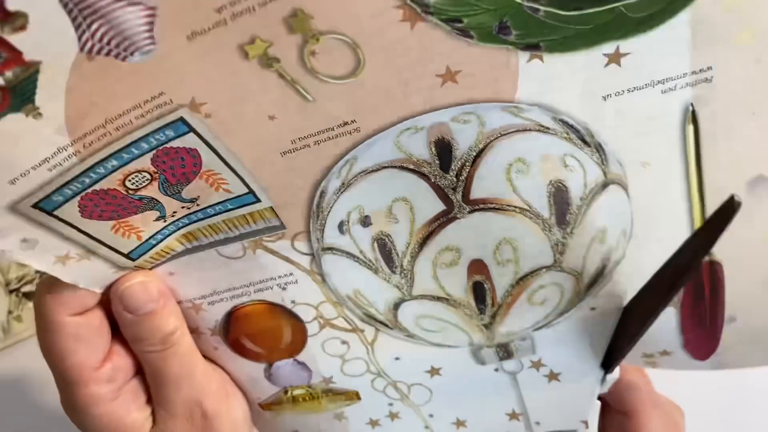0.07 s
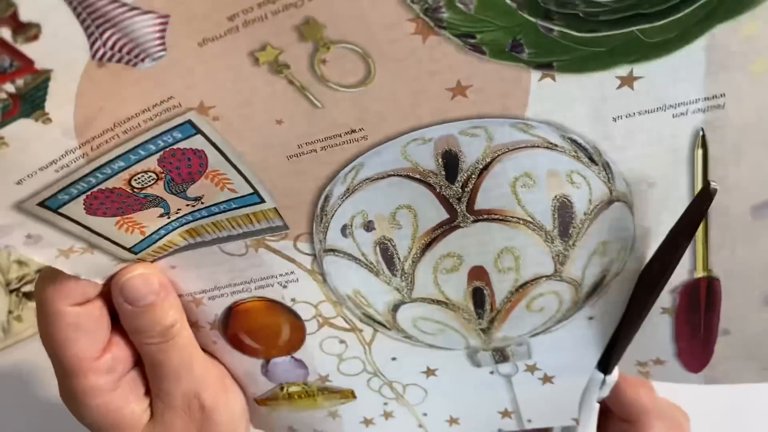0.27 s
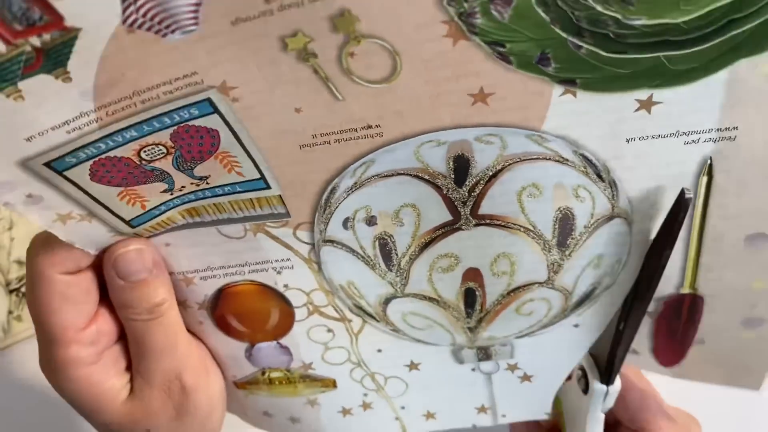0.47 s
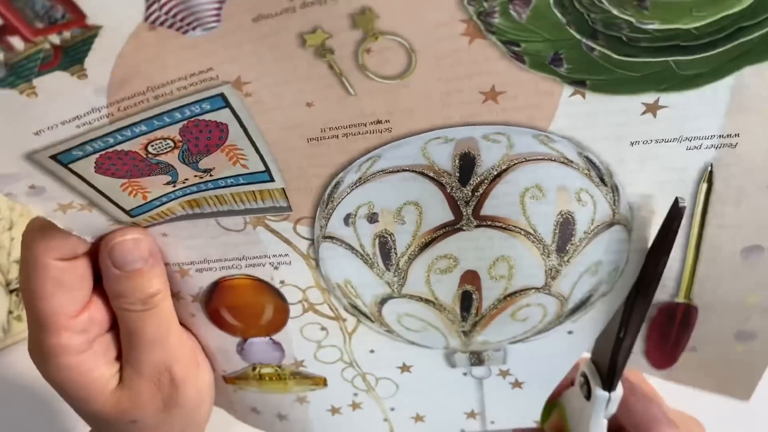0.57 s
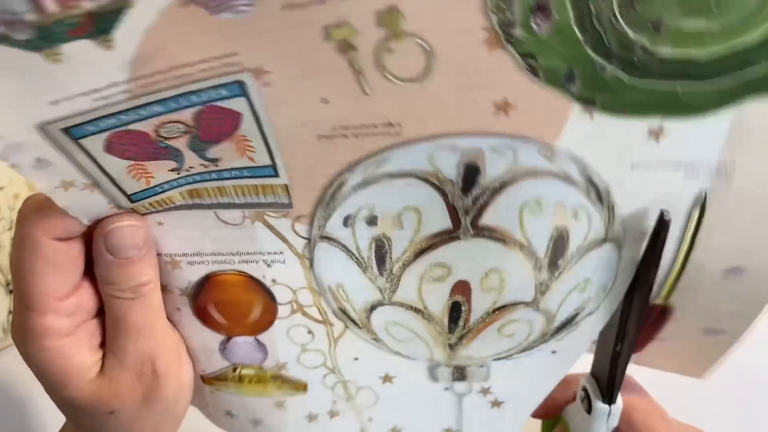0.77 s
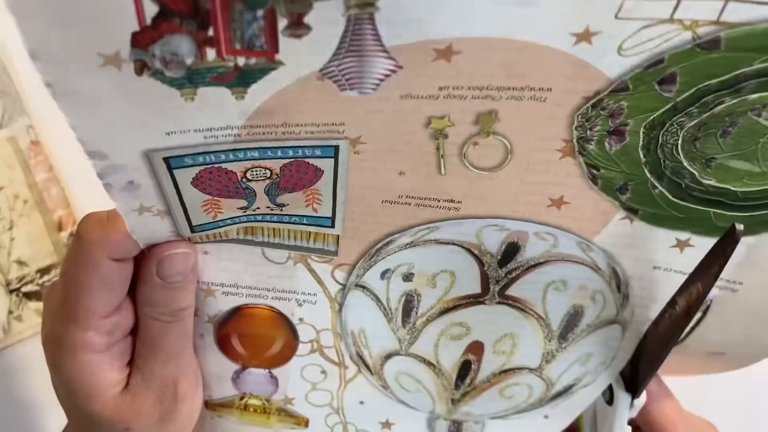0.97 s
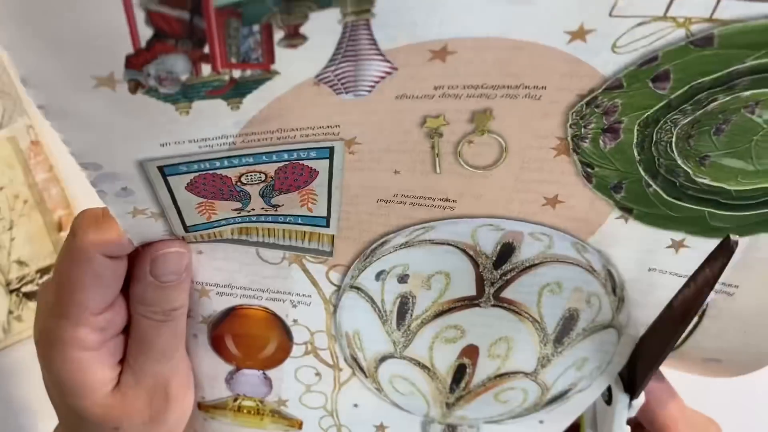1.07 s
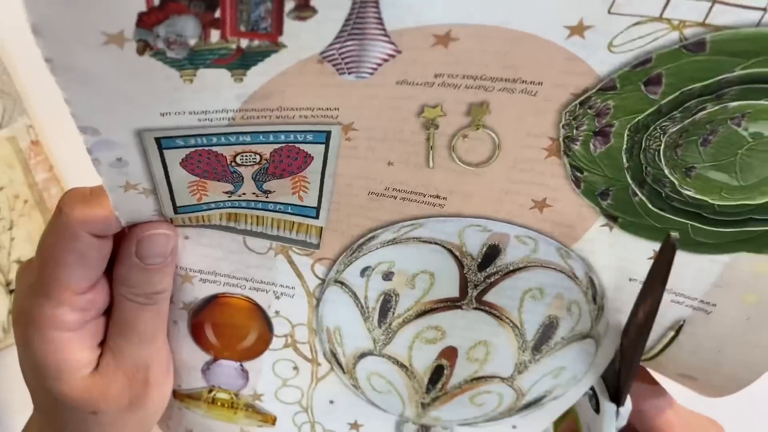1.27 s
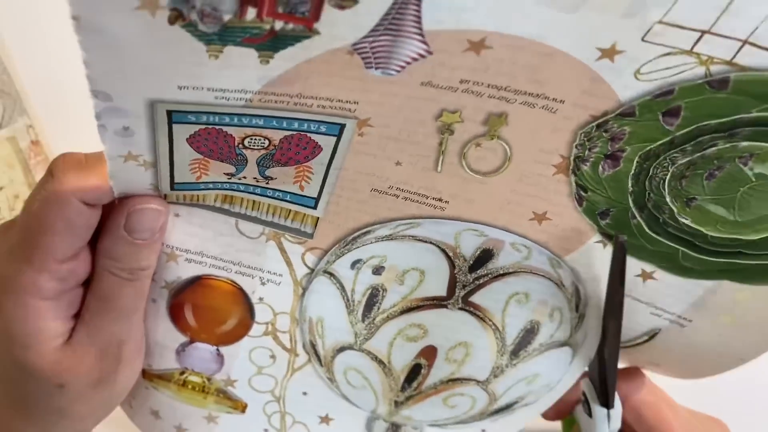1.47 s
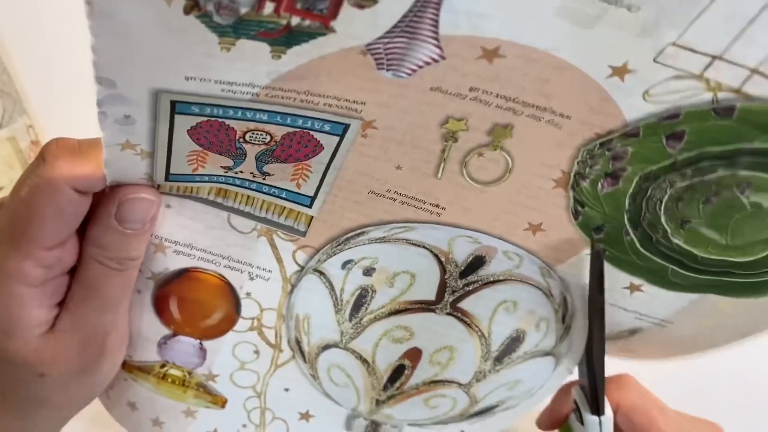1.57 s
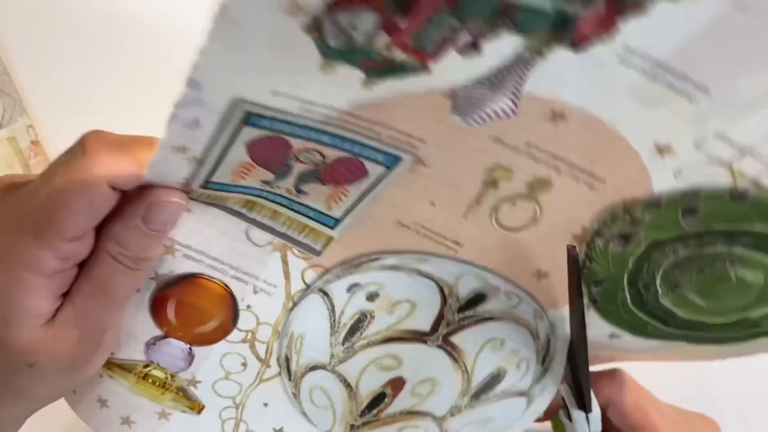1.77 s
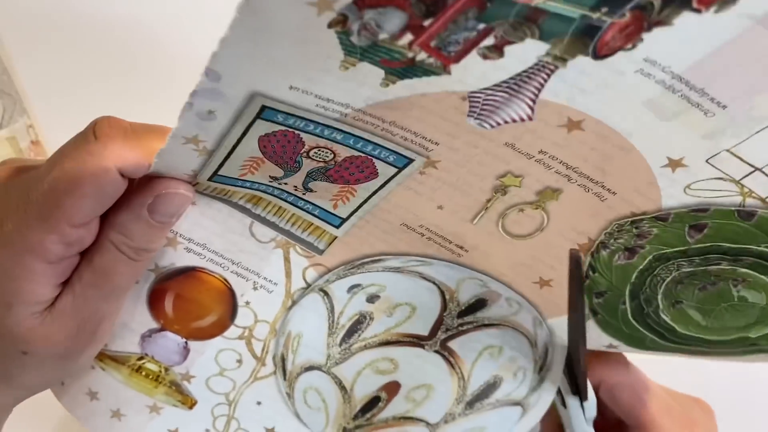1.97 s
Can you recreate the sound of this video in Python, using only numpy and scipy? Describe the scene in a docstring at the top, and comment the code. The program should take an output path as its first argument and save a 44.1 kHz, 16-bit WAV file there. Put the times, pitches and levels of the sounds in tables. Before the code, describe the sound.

Scissors cut through a thin paper page in a row of quick, crisp strokes, close to the microphone at an indoor desk. Between the snips the held sheet rustles, crackles and buckles with soft pops.

```python
"""Close to a phone's two microphone ports, scissors cut a thin page in a row of quick strokes.
The handled page rumbles, its creases crackle, and it buckles with pops that fall in pitch.
Fibres part in dense tiny clicks that ring the sheet and hiss along the blades.
Each port also hears the far parts of the sheet differently, which widens the sound."""
import sys
import numpy as np
from scipy import signal
from scipy.fft import rfft, irfft
from scipy.io import wavfile
from scipy.ndimage import uniform_filter1d

SR = 44100
rng = np.random.default_rng(int(sys.argv[2]) if len(sys.argv) > 2 else 0)


def output_pcm(signal):
    """Save a mono or channel-first signal as 16-bit PCM at the path in sys.argv[1].

    Samples are clipped to [-1, 1] before scaling.
    """
    pcm = np.clip(np.atleast_2d(signal).T, -1, 1) * 32767
    wavfile.write(sys.argv[1], SR, np.round(pcm).astype(np.int16))


N = 88244
T = np.arange(N) / SR
HZ = np.maximum(np.arange(N // 2 + 1) * SR / N, 1)


def undb(db):
    """Decibels to gain."""
    return 10 ** (np.asarray(db) / 20)


def over_hz(table):
    """A (freq_hz, value) curve read at every frequency, on a log axis."""
    freq_hz, values = np.array(table, float).T
    return np.interp(np.log(HZ), np.log(np.maximum(freq_hz, 1)), values)


def colour(x, eq):
    """EQ by a (freq_hz, gain_db) curve, rolling off beyond its ends; unit rms."""
    rolloff = np.minimum(HZ / eq[0][0], 1) ** 4 * np.minimum(eq[-1][0] / HZ, 1) ** 4
    shaped = irfft(rfft(x) * undb(over_hz(eq)) * rolloff, N)
    return shaped / shaped.std()


def waver(rate_hz):
    """Smoothed random steps with the slow drift taken out; unit spread."""
    hold = int(SR / rate_hz)
    steps = np.repeat(rng.standard_normal(N // 50), hold)[:N]
    wobble = uniform_filter1d(steps, hold // 2)
    wobble -= uniform_filter1d(wobble, 4 * hold)
    return wobble / wobble.std()


def envelope(age_s, rise_s, t60_ms):
    """Quick attack, then an exponential decay that takes at least 10 ms to fall 60 dB."""
    attack = 1 - np.exp(-age_s / rise_s)
    return attack * np.exp(-np.log(1000) * 1000 * age_s / np.maximum(t60_ms, 10))


def page_rumble():
    """The held page flexes: low noise with a wavering level."""
    # swell of the rumble: time_s, level_db
    swell = [(0, -55), (0.053, -24.5), (.09, -42), (.55, -45.5), (.69, -38.5), (.74, -40), (.765, -35.5),
             (.83, -30), (.92, -32), (1.09, -51.5), (1.15, -42.5), (1.32, -51), (1.37, -40.5),
             (1.55, -38.5), (1.66, -43.5), (1.77, -40), (1.9, -49), (2.0, -55.5)]
    # tone of the flexing page: freq_hz, gain_db
    rumble_eq = [(35, -15.5), (60, -0.5), (170, -1.5), (350, -8.5)]
    time_s, level_db = np.array(swell).T
    waver_db = 2.18 * waver(rate_hz=22)
    return undb(np.interp(T, time_s, level_db) + waver_db) * colour(rng.standard_normal(N), rumble_eq)


def crease_crackles(clicks):
    """Creases crackle: bursts of clicks in a broad resonance; longer scrapes swell more slowly."""
    # one burst per crease: start_s, relative_level_db, centre_hz, decay_ms
    creases = [(.0052, -7, 1510, 5.5), (0.0246, -12.5, 1730, 0.5), (0.3144, -15.5, 1945, 39.5),
               (0.343, -17.5, 2040, 120.5), (0.551, -28, 1810, 58.5), (0.609, -25, 2000, 141.5),
               (0.685, -19.5, 845, 109.5), (0.8, -14.5, 1460, 3.5), (0.8131, -16, 1560, 44.5),
               (0.817, -28.5, 3430, 298.5), (1.046, -29, 2470, 7), (1.292, -31, 2980, 16),
               (1.354, -25.5, 3430, 96.5), (1.239, -29.5, 775, 139.5), (1.299, -28, 870, 97),
               (1.327, -33, 1110, 53.5), (1.535, -15, 2516, 54.5), (1.7188, -11, 2483, 48.5),
               (1.954, -41, 3450, 28.5), (1.978, -21.5, 1530, 200)]
    rise_share, relative_width = 0.0156, 0.794
    out, spectrum = np.zeros(N), rfft(clicks)
    for start_s, level_db, centre_hz, decay_ms in creases:
        detune = (HZ / centre_hz - centre_hz / HZ) / relative_width
        band = irfft(spectrum / (1 + detune ** 2), N)
        burst = envelope(np.maximum(T - start_s, 0), rise_share * decay_ms / 1000, decay_ms)
        out += undb(level_db) / 2 * burst * band / band.std()
    return out


def buckle_pops():
    """Each buckle is a bending wave: high pitch first, falling fast to a short, lower ring."""
    # buckles of the sheet: start_s, level_db, start_pitch_hz, end_pitch_hz, ring_ms
    buckles = [(0.0462, -11.5, 770, 511, 12.5), (0.0534, -17.5, 483, 126.6, 40), (0.419, -8, 890, 728, 8),
               (.685, -20.5, 887, 382, 73.5), (0.7976, -10.5, 1086, 404, 21.5),
               (0.8139, -6, 1214, 145.8, 73.5), (0.8983, -6, 438, 313, 26),
               (0.885, -16.5, 90, 74.76, 202.5), (0.928, -16.5, 299, 170.8, 56), (1.3604, -9, 957, 331, 19),
               (1.538, -11.5, 900, 692.3, 27), (1.778, -18, 934, 148.2, 70.5)]
    fall_s, rise_cycles = 0.001754, 0.64
    out = np.zeros(N)
    for start_s, level_db, start_hz, end_hz, ring_ms in buckles:
        age_s = np.maximum(T - start_s, 0)
        cycles = end_hz * age_s + (start_hz - end_hz) * fall_s * (1 - np.exp(-age_s / fall_s))
        pop = envelope(age_s, rise_cycles / start_hz, ring_ms) * np.sin(2 * np.pi * cycles)
        out += undb(level_db) * pop
    return out


def fibre_clicks():
    """Paper fibres part in dense clicks of very uneven size, over a soft bed of noise."""
    clicks_per_s, spread_db = 3000, 4.0
    snaps = rng.random(N) < clicks_per_s / SR
    accent_db = spread_db * np.minimum(rng.exponential(size=N), 1.7)
    sizes = undb(accent_db) * rng.standard_normal(N)
    return snaps * sizes + .3 * rng.standard_normal(N)


def scissor_cut(clicks):
    """The clicks ring the curved sheet, with one hollow resonance, and hiss along the blades."""
    # level curves of the strokes: time_s, sheet_level_db, blade_level_db
    strokes = [ (0, -67.5, -40), (0.036, -33, -73.5), (0.049, -21.5, -49), (0.087, -31, -49.5),
               (.22, -30.5, -42), (0.26, -32.5, -43), (.272, -51, -58.5), (.288, -51.5, -61),
               (0.295, -35.5, -46.5), (0.337, -39, -58), (0.345, -32.5, -34.5), (0.391, -35.5, -48),
               (0.416, -30, -38), (0.465, -32.5, -43), (.5, -40.5, -55), (.575, -46.5, -61.5),
               (0.616, -31.5, -39), (0.649, -32.5, -43.5), (0.675, -45, -48), (0.689, -37, -57.5),
               (.72, -55, -62.5), (0.749, -48.5, -82.5), (0.756, -37.5, -46.5), (.79, -45.5, -38),
               (.811, -45.5, -46), (0.817, -23.5, -36.5), (0.866, -23.5, -47), (0.883, -38, -37.5),
               (0.937, -27.5, -40.5), (0.967, -37.5, -47), (1.014, -34.5, -53), (1.06, -60, -74),
               (1.09, -62.5, -76), (1.106, -35.5, -49), (1.198, -34, -48), (1.235, -42, -54),
               (1.274, -40, -51), (1.289, -46.5, -51.5), (1.345, -47, -51), (1.357, -34, -47),
               (1.54, -32.5, -38.5), (1.591, -29.5, -39), (1.603, -34.5, -53.5), (1.676, -55, -66.5),
               (1.69, -40, -37.5), (1.76, -36.5, -37.5), (1.861, -32, -39.5), (1.903, -36.5, -45.5),
               (1.931, -54, -59.5), (1.961, -68, -86), (1.973, -33, -38.5), (2.0, -27, -40.5)]
    # body of the cut sheet: freq_hz, gain_db
    sheet_eq = [(150, -31.5), (330, 5), (520, -0.5), (760, 1), (1200, 0), (2100, -1), (3300, -18.5),
                (4500, -18.5)]
    # bright hiss of the blades: freq_hz, gain_db
    blade_eq = [(3000, 9.5), (4200, -4), (5300, -1.5), (7500, -3.5), (10000, -2), (12500, -1), (15500, -38)]
    hollow_hz, hollow_width_hz, resonance_db = 732.4, 115.4, 2.5
    time_s, sheet_db, blade_db = np.array(strokes).T
    hollow = 1 + undb(resonance_db) / (1 + 2j * (HZ - hollow_hz) / hollow_width_hz)
    sheet = colour(irfft(rfft(clicks) * hollow, N), sheet_eq)
    blades = colour(clicks, blade_eq)
    return undb(np.interp(T, time_s, sheet_db)) * sheet + undb(np.interp(T, time_s, blade_db)) * blades


def scene():
    """The near sound through both ports, plus what each port alone hears of the wide sheet."""
    # phase between the ports: freq_hz, left_lead_rad
    port_phase = [(100, -.1), (340, -.3), (780, .2), (1380, -.1), (2760, 1), (4220, 1.2), (4820, 3.14),
                  (5400, 6.3), (6900, 7.3), (9650, 8.3), (11000, 3 * np.pi)]
    # balance between the ports: freq_hz, left_minus_right_db
    port_balance = [(60, -.5), (600, -2.8), (1200, -1.5), (3500, -2.6), (7000, 0)]
    # far parts of the sheet against the direct sound: freq_hz, gain_db
    width_eq = [(200, -25), (600, -2), (1300, -15), (3000, -4), (8000, 1.5), (11000, -12)]
    flutter_db, tail_db = 1.5, -7
    flutter = undb(flutter_db * waver(rate_hz=70))
    # three layers of paper with their own clicks: near, far left, far right
    paper = [scissor_cut(fibre_clicks() * flutter) + crease_crackles(fibre_clicks()) for _ in range(3)]
    # the sheet's dense modes: a short random tail behind every click
    tail = rng.standard_normal(N) * envelope(T, rise_s=0.00018, t60_ms=70)
    ring = 1 + undb(tail_db) * rfft(tail / np.linalg.norm(tail))
    near = rfft(paper[0]) * ring + rfft(page_rumble() + buckle_pops())
    wide = rfft(paper[1:]) * ring * undb(over_hz(width_eq))
    left_port = undb(over_hz(port_balance) / 2) * np.exp(.5j * over_hz(port_phase))
    return irfft(near * np.array([left_port, 1 / left_port]) + wide, N)


def record(dry):
    """Faint, dark microphone hiss, then a steep high cut."""
    hiss = undb(-59.5) * signal.lfilter([.3], [1, -.9], rng.standard_normal(dry.shape))
    cutoff_hz = 15800
    high_cut = signal.ellip(10, .2, 80, cutoff_hz, fs=SR, output="sos")
    return signal.sosfilt(high_cut, dry + hiss)


dry = scene()
out = record(dry)
output_pcm(out)
```